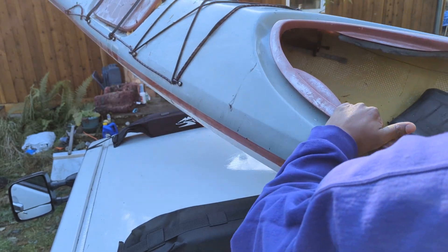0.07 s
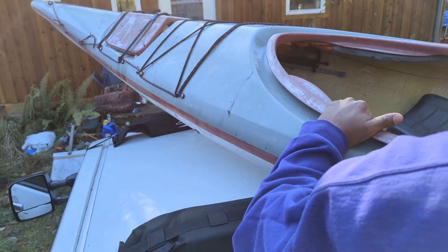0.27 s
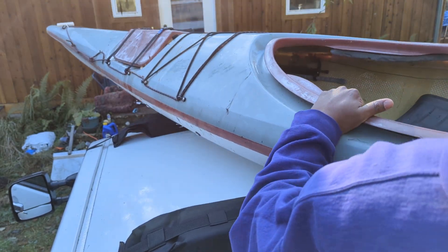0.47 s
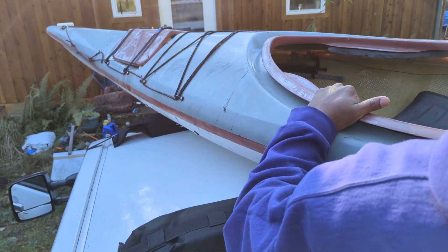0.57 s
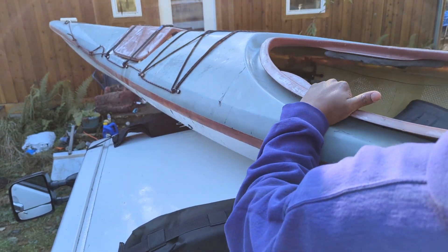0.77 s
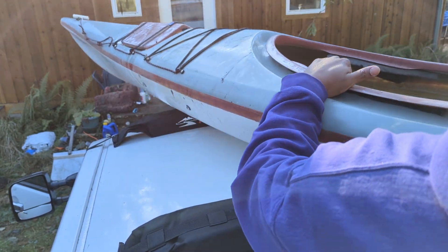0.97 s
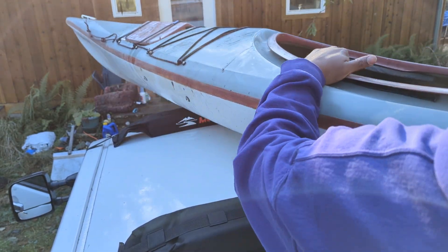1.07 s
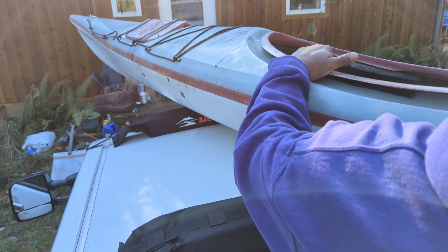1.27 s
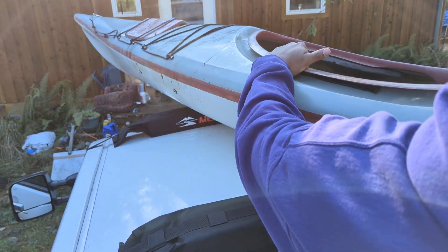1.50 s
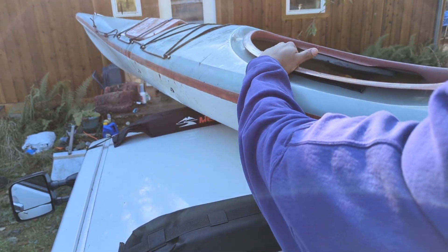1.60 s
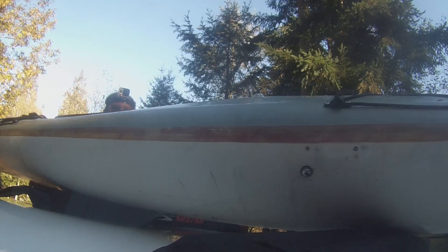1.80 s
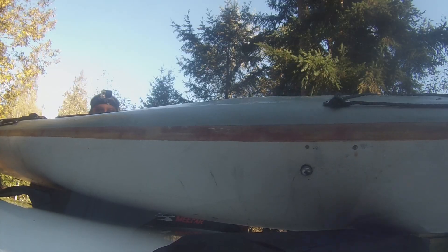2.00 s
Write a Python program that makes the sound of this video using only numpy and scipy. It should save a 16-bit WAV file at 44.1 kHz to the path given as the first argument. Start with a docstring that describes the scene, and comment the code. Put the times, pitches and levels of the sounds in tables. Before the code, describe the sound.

Close up in still outdoor air, a kayak slides over roof rack pads. Sharp clacks and a hollow, bouncing thud come first, then two long gritty rubs, split by a knock and marked by brief low groans.

```python
"""Outdoors, close to a car, a kayak is shoved along the roof rack. Its fittings clack and the hollow hull
drops onto the bars with a bouncing thud. Then it slides in two long hissing pushes with a knock between.
Each blow makes the boat ring; the hiss is many tiny catches as the hull rubs over the pads.
Where the hull sticks and slips it gives short low groans. Faint outdoor air lies behind it all."""
import sys
import numpy as np
from scipy import signal
from scipy.fft import rfft, irfft, next_fast_len
from scipy.io import wavfile
from scipy.ndimage import map_coordinates

SR = 44100
rng = np.random.default_rng(int(sys.argv[2]) if len(sys.argv) > 2 else 0)


def wrap_up_sound(samples):
    """Save the sound to the file named by the first command line argument, as 16-bit audio."""
    columns = np.atleast_2d(samples).T
    # keep every value between -1 and 1, then stretch to whole-number steps
    tamed = np.clip(columns, -1, 1)
    steps = np.round(tamed * 32767).astype(np.int16)
    wavfile.write(sys.argv[1], SR, steps)


N = 90404


def sliding():
    """The hull rubs over the pads with a fine hiss, a coarser scrape and a low drone."""
    # How loud each sound is over time. Each row: time in seconds, level in dB.
    hiss_levels = [(0, -62), (.22, -58), (.275, -46.5), (.365, -59.5), (.49, -41.5), (.71, -29), (.93, -28),
                   (1.02, -24), (1.05, -47.5), (1.16, -27.5), (1.3, -26.5), (1.53, -27), (1.59, -24.5),
                   (1.715, -27), (1.81, -53.5), (1.87, -55), (1.95, -54), (2.05, -65)]
    scrape_levels = [(0, -59), (.38, -49), (.49, -39), (.6, -37.5), (.69, -30.5), (.8, -28), (.88, -31.5),
                     (1.02, -30.5), (1.06, -40), (1.21, -33), (1.45, -28.5), (1.64, -30), (1.695, -26.5),
                     (1.8, -50), (1.84, -49.5), (1.88, -56.5), (2.05, -54.5)]
    drone_levels = [(0, -67), (.19, -49.5), (.25, -31), (.37, -39.5), (.43, -19), (.52, -32), (.62, -50.5),
                    (.8, -40), (1.01, -44), (1.075, -21.5), (1.2, -33.5), (1.3, -31.5), (1.42, -38),
                    (1.62, -38), (1.78, -45.5), (1.88, -55.5), (2.05, -56)]
    # The tone of each sound. Each row: frequency in Hz, level in dB.
    hiss_tone = [(1500, -45), (3700, -18), (4400, -2), (5300, -6.5), (6500, -8.5), (7250, -3.5), (8000, -7),
                 (9000, -4.5), (10600, -6), (11400, -0.5), (12100, 1), (12700, -8.5), (14000, -6.5),
                 (15500, -9.5)]
    scrape_tone = [(300, -26), (700, -18), (1050, -12), (1600, -3), (2300, -1), (3000, -2.5), (3600, -3.5),
                   (4350, -3), (5200, -17.5), (7000, -10.5), (15000, -62)]
    drone_tone = [(30, -48), (75, -16), (125, -5.5), (220, -5), (320, 1.5), (430, 0.5), (560, -5),
                  (720, -8.5), (1100, -16), (2000, -22.5), (5000, -75)]
    hiss = level(hiss_levels) * amp(0.67 * wobble(59.9))
    hiss = hiss * grainy_noise(hiss_tone, grains_per_s=7600, rush=1)
    scrape = level(scrape_levels) * amp(0.6 * wobble(81))
    scrape = scrape * grainy_noise(scrape_tone, grains_per_s=2900, rush=1)
    drone = level(drone_levels) * amp(2.63 * wobble(40.2))
    drone = drone * grainy_noise(drone_tone, grains_per_s=1500, rush=0.89)
    return hiss + scrape + drone


def hull_thuds():
    """The whole hull bounces on the bars: soft blows that ring its low notes."""
    # Each row: start in seconds, level in dB, favoured pitch in Hz, width in octaves, echo in dB.
    blows = [(.135, -37.5, 147, 0.25, -23), (.29, -27, 200, 0.59, -3), (.33, -21.5, 132, 1, -12),
             (.39, -3.5, 171, 0.48, -14.5), (.405, -9, 181, 1, -1), (.419, -11, 382, 0.91, -19),
             (.453, -11, 78, 1, -23), (.468, -13, 350, 1, -10.5), (.481, -10, 146, 0.87, -30),
             (.529, -11, 83.5, 1, -14), (.578, -19, 82, 0.69, -4), (.6, -25, 67, .6, -20),
             (1.078, -14, 295, 1, -14), (1.11, -16.5, 238, 0.87, -8), (1.265, -27.5, 132, 0.52, -0.5),
             (1.77, -33.5, 73.4, 0.97, -7.5)]
    # The hull's notes. Each row: pitch in Hz, level in dB, seconds to fade by 60 dB.
    notes = [(59.4, -6.5, 0.38), (70, -3, 0.24), (92, 9.5, 0.07), (151.8, -1, .2), (181.8, 7.5, 0.096),
             (206.2, 8, 0.1), (221.3, -2, 0.114), (262, 4.5, 0.085), (334, 2, 0.086), (392, -9, 0.26),
             (668.7, -2, 0.12)]
    return strike(blows, notes, attack_s=0.0069, chatter_db=-12, chatter_s=0.063, left_lag_s=0.00026)


def shell_knocks():
    """The boat's shell hits a bar: hard blows that ring its middle notes."""
    # Each row: start in seconds, level in dB, favoured pitch in Hz, width in octaves, echo in dB.
    blows = [(.0465, -34, 940, 0.98, -3.5), (.2085, -11.5, 720, 1.67, -12), (.235, -17, 1350, 0.42, -0.5),
             (.401, -17.5, 1080, 1.5, -11), (.423, -19.5, 1080, 1.1, -10), (1.0285, -6, 1490, .9, -10.5),
             (1.0378, -12, 700, 0.95, -11), (1.076, -22.5, 700, 1.6, -7.5), (1.236, -25, 1530, 0.78, -4.5),
             (1.343, -20.5, 1550, 0.4, -15), (1.488, -28.5, 1280, 0.84, -8)]
    # The shell's notes. Each row: pitch in Hz, level in dB, seconds to fade by 60 dB.
    notes = [(225, 1, 0.086), (516, 2, 0.039), (594, 0, 0.027), (835, -1.5, 0.043), (1212, 1, 0.021),
             (1396, 0, 0.018), (1513, -1, 0.021), (1700, -3, 0.017), (2350, -5, 0.023), (2850, -4.5, 0.034)]
    return strike(blows, notes, attack_s=0.00064, chatter_db=-1.5, chatter_s=0.02, left_lag_s=0.00047)


def fitting_clacks():
    """The fittings clack: sharp blows that ring high, very short notes."""
    # Each row: start in seconds, level in dB, favoured pitch in Hz, width in octaves, echo in dB.
    blows = [(.1262, -15.5, 1880, 0.82, -10.5), (.2245, -5.5, 2620, 1.01, -14),
             (.2285, -31, 2600, 1.5, -15), (1.0375, -9.5, 2320, 1.5, -11)]
    # The fittings' notes. Each row: pitch in Hz, level in dB, seconds to fade by 60 dB.
    notes = [(1266, 5.5, 0.013), (1696, 4.5, 0.013), (2064, -2.5, 0.022), (2318, -4.5, 0.023),
             (2460, 4, 0.011), (2700, -10.5, 0.018), (3527, -2.5, 0.016), (3986, -9, 0.026),
             (5950, -4.5, .014), (6120, -7.5, 0.013), (9100, -16, 0.021)]
    return strike(blows, notes, attack_s=0.00051, chatter_db=-1.5, chatter_s=0.014, left_lag_s=0.000437)


def groans():
    """The hull sticks and slips at an uneven rate, making short low notes that swell and fade."""
    # Each row: start in seconds, length in seconds, pitch in Hz, level in dB.
    swells = [(0.769, 0.079, 404, -42.5), (0.821, 0.038, 328, -35.5), (0.866, 0.038, 330, -34.5),
              (.904, 0.042, 325, -31.5), (1.11, 0.066, 292.6, -23), (1.226, 0.033, 255.4, -26.5),
              (1.256, 0.0375, 262, -24.5), (1.29, 0.061, 321, -27.5), (1.361, 0.09, 397.6, -38),
              (1.475, .04, 415.6, -37.5)]
    pitch_jitter, flutter_db = 0.035, 1.5
    out, t = np.zeros(N), np.arange(N) / SR
    for start, length, hz, db in swells:
        progress = np.clip((t - start) / length, 0, 1)
        pitch = hz * (1 + pitch_jitter * wobble(150))
        phase = 2 * np.pi * np.cumsum(pitch * (t > start)) / SR
        # Every other slip differs, which adds a faint note an octave below.
        slips = np.sin(phase) + amp(-22) * np.sin(2 * phase) + amp(-18) * np.sin(phase / 2)
        out += amp(db + flutter_db * wobble(120)) * np.sin(np.pi * progress) * unit(slips)
    return out * pan(1.0)


def rasps():
    """Where a pad grips harder, the rubbing swells into a brief gritty rasp."""
    # Each row: peak time and half width in seconds, level in dB, centre in Hz, width in octaves.
    grips = [(.745, 0.056, -25.5, 3080, 0.45), (1.68, 0.033, -33.5, 2250, .25)]
    out, t = np.zeros((2, N)), np.arange(N) / SR
    hz = np.geomspace(300, 15000, 60)
    for peak_s, width_s, db, centre_hz, octaves in grips:
        band_db = -20 * np.log10(1 + (np.log2(hz / centre_hz) / octaves) ** 4)
        swell = amp(db) / np.cosh((t - peak_s) / width_s) ** 2
        out += swell * grainy_noise(np.transpose([hz, band_db]), grains_per_s=2800, rush=0.73)
    return out


def hollow_echo(x, build_s):
    """The hollow boat and the yard answer a blow with a blurred echo whose treble dies first."""
    # Each row: frequency in Hz, seconds to fade by 60 dB.
    fade_times = [(100, 0.32), (400, 0.32), (1200, .25), (2600, 0.22), (7000, 0.065), (15000, 0.029)]
    hz, t, noise = signal.stft(rng.standard_normal((2, SR // 2)), SR, nperseg=256)
    shape = amp(-60 * t / along(fade_times, hz)[:, None]) * (1 - np.exp(-t / build_s))
    tail = signal.istft(noise * shape, SR, nperseg=256)[1]
    tail /= np.linalg.norm(tail[0])
    return spread(signal.fftconvolve(x[None], tail, axes=1)[:, :N])


def outdoor_air():
    """Still outdoor air: a faint, steady, low rush."""
    # Each row: frequency in Hz, level in dB.
    tone = [(20, -31), (40, -19), (65, -9), (120, -9), (250, -13), (600, -14), (1500, -23.5), (4000, -35),
            (15000, -79)]
    return amp(-46.5) * grainy_noise(tone, grains_per_s=4800, rush=1.17)


def strike(blows, notes, attack_s, chatter_db, chatter_s, left_lag_s):
    """Each blow chatters briefly, rings the notes near its favoured pitch and sets off an echo."""
    echoes, direct, t = np.zeros((2, N)), np.zeros(N), np.arange(SR // 2) / SR
    hz, note_db, fade_s = np.transpose(notes)
    rings = np.sin(2 * np.pi * hz[:, None] * t) * amp(-60 * t / fade_s[:, None])
    rings *= 1 - np.exp(-t / attack_s)
    rings = signal.sosfilt(signal.butter(2, hz.min() / 2, "high", fs=SR, output="sos"), rings)
    for start, db, favoured_hz, octaves, echo_db in blows:
        nearness = np.exp(-(np.log2(hz / favoured_hz) / octaves) ** 2)
        ring = (amp(note_db) * nearness) @ rings
        chatter = rng.standard_normal(len(t)) * amp(-60 * t / chatter_s)
        force = (t == 0) + amp(chatter_db) * chatter / np.linalg.norm(chatter)  # one tap, then chatter
        hit = amp(db) * signal.fftconvolve(force, ring / abs(ring).max())
        hit = np.pad(hit, (round(start * SR), N))[:N]
        direct += hit
        echoes += amp(echo_db) * hollow_echo(hit, build_s=0.0013)
    delays = np.array([[0.5], [-0.5]]) * left_lag_s  # the blow is heard on the right first
    return echoes + filtered(direct, lambda f: np.exp(-2j * np.pi * f * delays))


def grainy_noise(tone, grains_per_s, rush):
    """Tiny random clicks over a smooth rush, shaped to a tone and placed a little to the left."""
    # Each row: frequency in Hz, how much louder the left is in dB.
    lean = [(100, 1.5), (400, 1.5), (1000, 2), (2200, 6), (4200, 6.5), (7500, 4), (10000, 7), (12000, -0.5),
            (15500, 1)]
    grains = rng.standard_normal((2, N)) * (rng.random(N) < grains_per_s / SR)
    noise = spread(unit(grains) + rush * rng.standard_normal((2, N)))
    return unit(filtered(noise, lambda hz: amp(along(tone, hz)) * pan(along(lean, hz))))


def spread(pair):
    """Mix two unrelated sounds into left and right: alike in the bass, different in the treble."""
    # Each row: frequency in Hz, how alike the sides are (1 is the same, 0 is unrelated).
    likeness = [(60, 1), (200, 0.96), (400, 0.78), (800, 0.44), (2000, 0.4), (4500, -0.15), (8000, -0.18),
                (12000, 0.18)]
    angle = lambda hz: np.arccos(np.clip(along(likeness, hz), -1, 1)) / 2
    mid, side = filtered(pair, lambda hz: np.array([np.cos(angle(hz)), np.sin(angle(hz))]))
    return np.array([mid + side, mid - side])


def amp(db):
    """Turn decibels into a gain, the number to multiply a sound by."""
    return 10 ** (np.asarray(db) / 20)


def unit(x):
    """Scale a sound to an average strength (rms) of 1."""
    return x / np.sqrt(np.mean(x ** 2) + 1e-20)


def along(points, hz):
    """Read between rows of frequency and value, with octaves evenly spaced."""
    row_hz, values = np.transpose(points)
    return np.interp(np.log(hz + 1), np.log(row_hz + 1), values)


def level(rows):
    """Turn rows of seconds and dB into a gain for every sample."""
    return amp(np.interp(np.arange(N) / SR, *np.transpose(rows)))


def wobble(per_second):
    """A smooth curve through this many random values a second."""
    return map_coordinates(rng.standard_normal(N // 8), [np.arange(N) * per_second / SR], mode="wrap")


def filtered(x, response):
    """Multiply each frequency in a sound by response(hz)."""
    size = next_fast_len(N + SR // 2)
    hz = np.fft.rfftfreq(size, 1 / SR)
    return irfft(rfft(x, size) * response(hz), size)[..., :N]


def pan(db):
    """Left and right gains that make the left louder by db."""
    return amp(np.array([[1], [-1]]) * db / 2)


def scene():
    """The kayak's blows and rubbing over the outdoor air."""
    blows = fitting_clacks() * pan(0.6) + shell_knocks() * pan(-1.4) + hull_thuds() * pan(0.6)
    return blows + outdoor_air() + sliding() + rasps() + groans()


def record(dry):
    """Cut the highest treble and thin the deepest bass."""
    top_hz, bass_hz = 16020, 38
    return filtered(dry, lambda hz: (hz < top_hz) * (1 - 1 / (1 + (hz / bass_hz) ** 6)))


dry = scene()
out = record(dry)
wrap_up_sound(out)
```